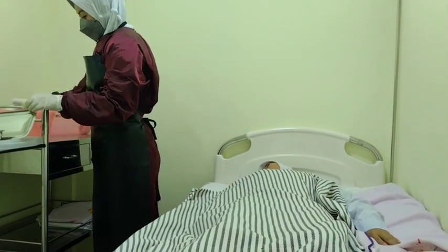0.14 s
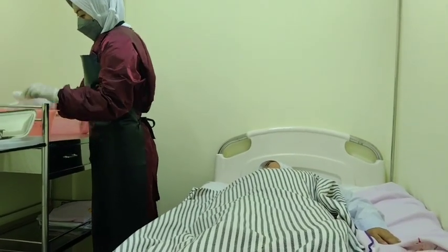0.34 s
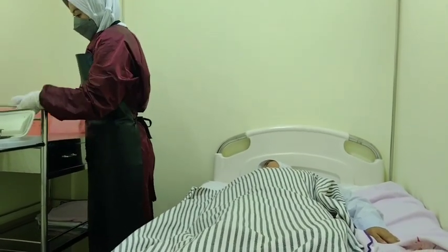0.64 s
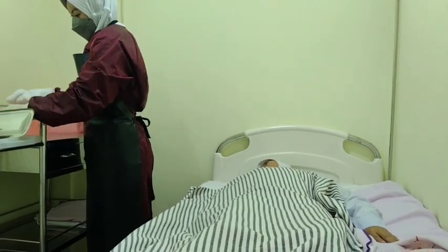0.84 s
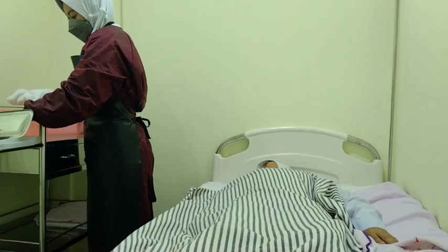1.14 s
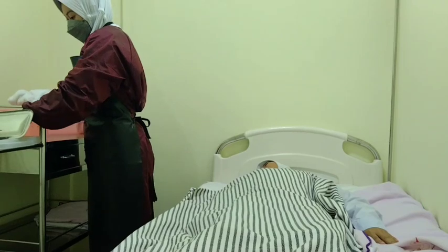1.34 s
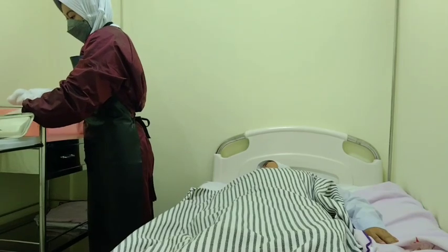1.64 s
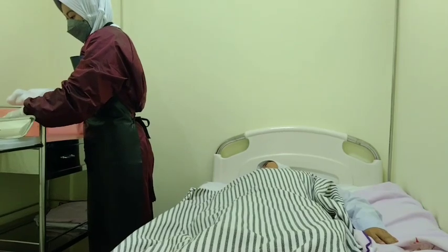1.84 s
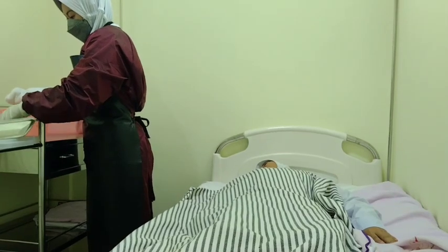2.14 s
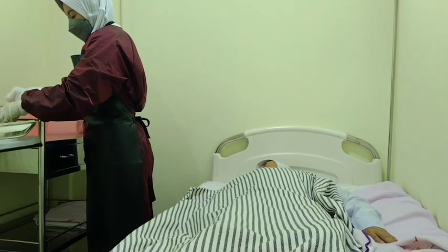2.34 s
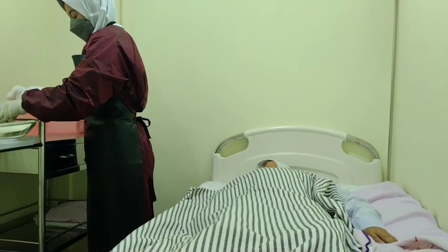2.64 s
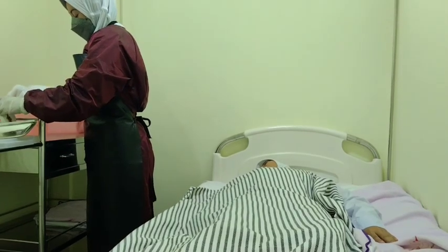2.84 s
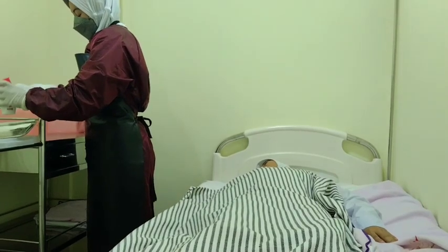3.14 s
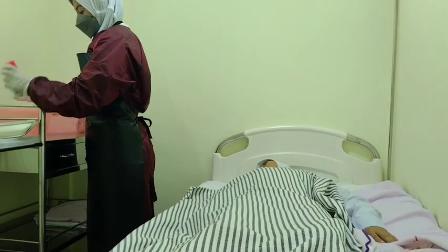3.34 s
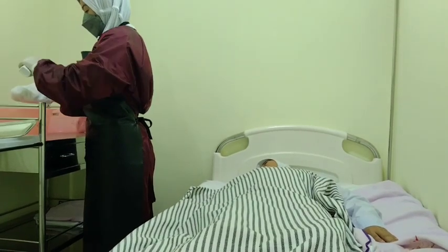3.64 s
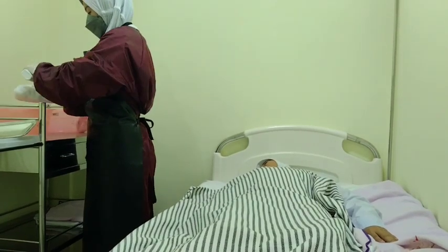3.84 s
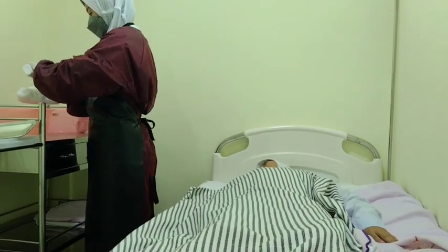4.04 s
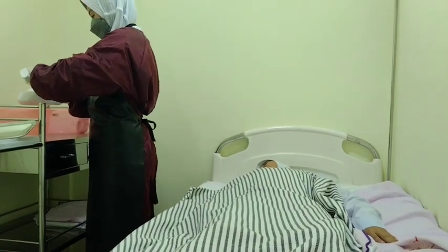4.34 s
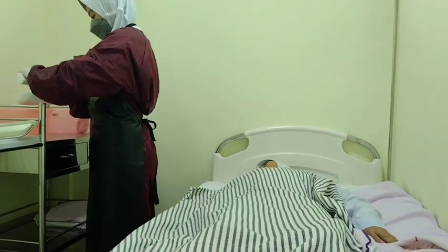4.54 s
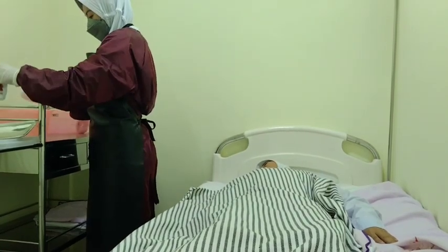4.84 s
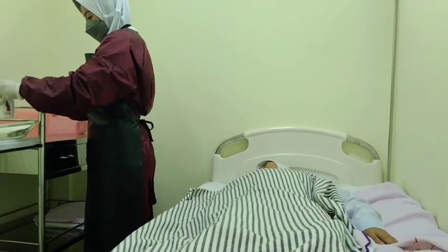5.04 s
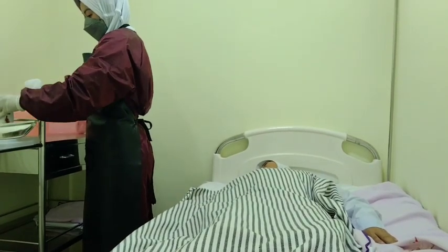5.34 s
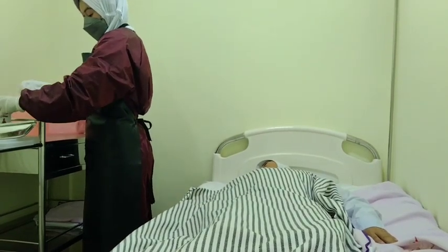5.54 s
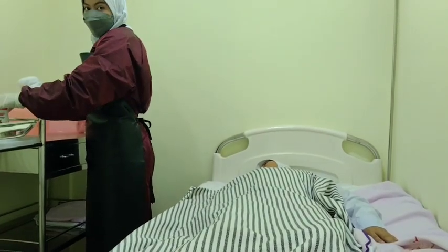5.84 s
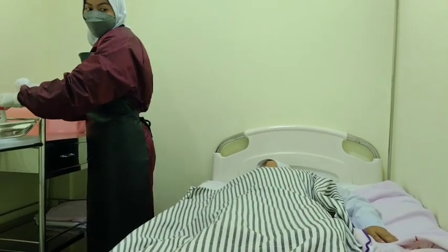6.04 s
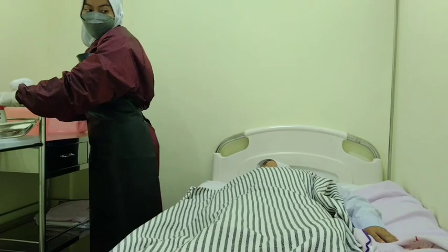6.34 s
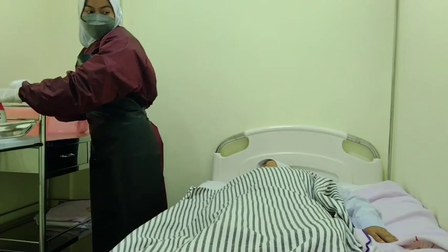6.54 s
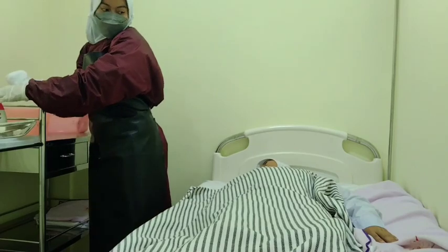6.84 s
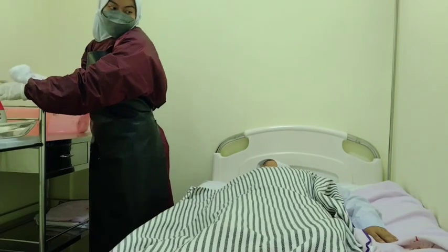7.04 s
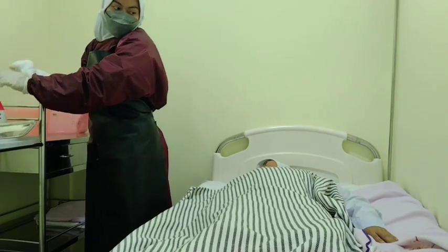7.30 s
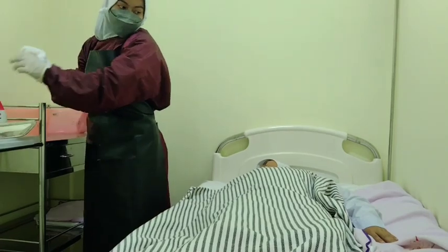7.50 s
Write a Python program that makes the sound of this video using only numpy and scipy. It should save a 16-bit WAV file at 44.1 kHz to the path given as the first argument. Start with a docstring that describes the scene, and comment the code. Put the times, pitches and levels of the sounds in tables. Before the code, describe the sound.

In a bare, echoing room with a low fan hum, a steel basin of water is lightly tapped and slid on a metal trolley. Cloth rustles, small rattles build to a loud ringing clang with plops and sloshing. After a quieter spell, a plastic bottle pops twice, then the basin knocks again with watery plops. Faint rustling ends it. The microphone is some way off, with steady noise held down.

```python
"""A fan hums in a bare, echoing room; then a steel basin of water is tapped, slid, jiggled and knocked on a metal trolley.
Shaped bursts of grit make the blows, and fading sine tones make the ringing steel, plops, bubbles and booms.
A washcloth rustles in gloved hands as a crackle of tiny grains; wet gloves tick at small pitches.
A plastic bottle snaps in narrow bands of noise and springs back with a rising rasp; faint high chirps waver.
A noise suppressor holds the steady noise down."""
import sys
import numpy as np
from scipy import signal
from scipy.fft import rfft, irfft
from scipy.io import wavfile
from scipy.ndimage import uniform_filter1d

SR = 44100
rng = np.random.default_rng(int(sys.argv[2]) if len(sys.argv) > 2 else 0)


def output_pcm(signal):
    """Save a mono or channel-first signal as 16-bit PCM at the path in sys.argv[1].

    Samples are clipped to [-1, 1] before scaling.
    """
    pcm = np.clip(np.atleast_2d(signal).T, -1, 1) * 32767
    wavfile.write(sys.argv[1], SR, np.round(pcm).astype(np.int16))


N = 338179
TIME = np.arange(N) / SR
BLOW_SIZE = 8192  # samples in one short sound
BLOW_S = 0.028  # a blow's level is its energy spread over this time
CUTOFF_HZ = 15800  # nothing much is left above this


def from_db(db):
    """Turns decibels into a plain factor for the wave's size."""
    return 10 ** (np.asarray(db) / 20)


def rms_one(x):
    """Scales a sound to an average (RMS) size of 1."""
    return x / np.sqrt(np.mean(x ** 2) + 1e-20)


def energy_one(x):
    """Scales a sound to a total energy of 1."""
    return x / np.sqrt(np.sum(x ** 2) + 1e-20)


def at_hz(points, hz):
    """Reads a table on a log-frequency axis."""
    known_hz, values = np.transpose(points)
    return np.interp(np.log(np.maximum(hz, 1)), np.log(known_hz), values)


def below(x, edge, order):
    """Near 1 under the edge, one half on it, near 0 over it; a higher order is steeper."""
    return 1 / (1 + (x / edge) ** order)


def peak(hz, centre_hz, width_hz, level_db):
    """Power of one resonance with steep skirts."""
    detuning = (hz ** 2 - centre_hz ** 2) / (hz * width_hz + 1)
    return from_db(level_db) ** 2 / (1 + detuning ** 2) ** 2


def response(gain):
    """The impulse response with this gain at each frequency, made to start at once (minimum phase)."""
    cepstrum = irfft(np.log(gain + 1e-6))
    cepstrum[1:len(gain) - 1] *= 2
    cepstrum[len(gain):] = 0
    return irfft(np.exp(rfft(cepstrum)))


def coloured(x, gain):
    """Filters a sound so that each frequency gets its own gain."""
    return signal.oaconvolve(x, response(gain))[:len(x)]


def blow_axes():
    """Seconds and frequencies of one short blow."""
    return np.arange(BLOW_SIZE) / SR, np.fft.rfftfreq(BLOW_SIZE, 1 / SR)


def add(out, s, level_db, sound):
    """Places a blow; its level is that of its energy spread over BLOW_S."""
    at = round(s * SR)
    blow = from_db(level_db) * np.sqrt(BLOW_S * SR) * energy_one(sound)
    out[at:at + len(sound)] += blow[:N - at]


def strokes(middle_s, level_db, half_s):
    """Gain of a movement that swells and fades."""
    return from_db(level_db) * np.exp(-((TIME - middle_s) / half_s) ** 2 / 2)


def grit(count, spread_db):
    """Dense tiny contacts whose size changes every 32 samples."""
    sizes_db = spread_db * np.repeat(rng.standard_normal(count // 32 + 1), 32)[:count]
    return rms_one(rng.standard_normal(count) * from_db(sizes_db))


def contact(t, chatter_s, click_db, grip_s):
    """A first click, then a chatter that builds as the surfaces meet and dies away."""
    fade = np.exp(-t / max(chatter_s, .001))  # never shorter than 1 ms
    force = energy_one(grit(BLOW_SIZE, spread_db=5) * (1 - np.exp(-t / grip_s)) * fade)
    force[0] += from_db(click_db)
    return force


def touch_gain(hz, hollow_db, edge_db):
    """A heavy touch adds body; a hard one holds back everything under the bright edge."""
    hollow = hollow_db * below(hz, edge=630, order=4)
    return from_db(hollow - edge_db * below(hz, edge=4700, order=4))


def thicket(hz, start_hz, width_hz, between_db, count):
    """Many narrow modes of uneven strength crowd the treble; returns a gain of mean power 1."""
    draws = rng.random((count, 2))
    centres = start_hz + (CUTOFF_HZ - start_hz) * (np.arange(count) + draws[:, 0]) / count
    power = sum((0.15 + size) ** 2 / (1 + (2 * (hz - centre) / width_hz) ** 2)
                for centre, size in zip(centres, draws[:, 1]))
    power = power / power[(hz > start_hz) & (hz < CUTOFF_HZ)].mean()
    between = from_db(between_db) ** 2  # fills the gaps between modes
    return np.sqrt(np.where(hz > start_hz, (power + between) / (1 + between), 1))


def sheet(hz):
    """Every touch lands elsewhere on the thin steel and favours other treble modes."""
    return thicket(hz, start_hz=2400, width_hz=22, between_db=-5, count=120)


# fan hum lines: (f/Hz, level/dB as RMS)
HUM_LINES = [(91.5, -49), (95.8, -56.5), (150.7, -59), (184, -55)]
# colour of the moving room air: (f/Hz, level/dB)
AIR_COLOUR = [(25, -28.5), (64, -25), (78, -23.5), (96, -5.5), (119, -12), (188, -8), (313, -15.5),
              (567, -16.5), (722, -22), (1490, -23), (3400, -36.5), (4100, -32), (4800, -42.5),
              (15500, -45.5)]
AIR_DB = -49


def fan(waver_hz=.6):
    """Beating, slowly wandering hum lines over the noise of moving air."""
    _, hz = blow_axes()
    out = from_db(AIR_DB) * rms_one(coloured(rng.standard_normal(N), from_db(at_hz(AIR_COLOUR, hz))))
    for line_hz, line_db in HUM_LINES:
        wander = np.interp(TIME, np.linspace(0, TIME[-1], 60), rng.standard_normal(60))
        phase = 2 * np.pi * np.cumsum(line_hz + waver_hz * wander) / SR
        out += from_db(line_db) * np.sqrt(2) * np.sin(phase)
    return out


# wall modes of the water-damped basin, each with one more wave round the rim: (f/Hz, width/Hz, level/dB)
WALL_MODES = [(295, 60, -1.5), (761, 62, 9.5), (1190, 120, -0.5), (1580, 240, 1)]
# the rim's main resonance, a single row: (f/Hz, width/Hz, level/dB before the touch's own rim level)
RIM_RESONANCE = (2240, 290, 3.5)
# broad treble of thin steel: (f/Hz, width/Hz, level/dB)
STEEL_SHEEN = [(3400, 1000, -10.5), (7100, 5200, -11.5), (12600, 7600, -27)]


def basin_gain(hz, place, rim_db, between_db=-10.0):
    """A wall mode stays quiet when touched near one of its nodes; the tray fills in between the modes."""
    wall = sum(peak(hz, *mode) * (np.cos((k + 1) * place) ** 2 + .01)
               for k, mode in enumerate(WALL_MODES))
    rim = peak(hz, *RIM_RESONANCE) * from_db(rim_db) ** 2
    tray = peak(hz, centre_hz=1440, width_hz=1100, level_db=between_db)
    sheen = sum(peak(hz, *mode) for mode in STEEL_SHEEN)
    return np.sqrt(wall + rim + tray + sheen)


# light taps on the basin: (t/s, level/dB, bright edge/dB, place round the rim/rad, rim mode/dB)
BASIN_TAPS = [(0.195, -26.5, -2.5, 1.58, 2), (.948, -26, -3, 0, -4.5), (1.005, -33.5, -16.5, 0, -12.5),
              (1.246, -51, -14.5, 0, 15.5), (5.533, -30.5, -0.5, 0.42, 10.5), (5.872, -38, -17, 0.18, 28)]
TAP_CHATTER_S, TAP_HOLLOW_DB = 0.0042, -6.5


def taps():
    """Light touches wake mostly the basin's own modes."""
    out, (t, hz) = np.zeros(N), blow_axes()
    for s, level_db, edge_db, place, rim_db in BASIN_TAPS:
        gain = basin_gain(hz, place, rim_db) * sheet(hz) * touch_gain(hz, TAP_HOLLOW_DB, edge_db)
        add(out, s, level_db, coloured(contact(t, TAP_CHATTER_S, click_db=-10.0, grip_s=0.0019), gain))
    return out


# the rim's cluster of close modes, set off by taps and knocks: (f/Hz, level/dB, T60/s)
RIM_MODES = [(2239, -1, 0.79), (2230, 1, 0.8), (2269, -4, 0.9)]
# long ringing modes of the steel, set off by knocks: (f/Hz, level/dB, T60/s)
STEEL_MODES = [(299, -1, .6), (495, -10, 0.54), (547, -7, 1), (1065, -8.5, 0.88), (1044, -5.5, .8),
               (1258, -7.5, 0.72), (1340, -9, 1), (1483, -10.5, 0.88), (1635, -7, 0.97), (2000, -12.5, .8),
               (2490, -1.5, .8), (2653, -6.5, 1), (3700, -16, .6), (3692, -21.5, 0.53), (3950, -17.5, 1),
               (4830, -24, 1), (5160, -22, .5), (6600, -23, 0.36), (6829, -18, 0.64), (7380, -21.5, .5)]


def ringing(rows, modes, ring_db):
    """Contacts feed each steel mode; energies add up and die away, and swaying water bends the pitch."""
    out, at = np.zeros(N), [round(row[0] * SR) for row in rows]
    levels_db = np.array(rows)[:, 1]
    for hz, mode_db, t60 in modes:
        fed = np.zeros(N)
        fed[at] = from_db(levels_db + mode_db + ring_db + rng.standard_normal(len(at))) ** 2
        kept = from_db(-60 / (t60 * SR)) ** 2  # share of the energy left after one sample
        energy = signal.lfilter([1], [1, -kept], fed + 1e-18)
        sway_hz = 6 * np.interp(TIME, np.linspace(0, TIME[-1], 130), rng.standard_normal(130))
        out += np.sqrt(energy) * np.sin(2 * np.pi * np.cumsum(hz + sway_hz) / SR)
    return out


# the larger plops of the water: (t/s, level/dB, f/Hz at the start)
WATER_PLOPS = [(.212, -39, 489), (.265, -46.5, 552), (0.972, -39, 285), (1.445, -37.5, 320),
               (2.155, -49.5, 470), (2.188, -36.5, 305), (2.262, -21, 303.3), (2.370, -25, 320),
               (2.590, -30.5, 321), (2.625, -41.5, 200), (2.712, -34, 500), (2.738, -42.5, 682),
               (3.823, -49.5, 504), (5.443, -22.5, 529), (5.495, -27, 310), (5.628, -33, 515),
               (5.626, -20, 290), (5.655, -26.5, 503), (5.675, -28.5, 190), (5.795, -44, 530),
               (5.810, -39.5, 175), (5.892, -34, 295)]
PLOP_CYCLES = 25  # cycles of the starting pitch until a plop has died away
DROP_S, DROP_DB, DROP_PITCH = 0.04, -11.5, 1.5  # the smaller drop: delay, level change, pitch ratio


def water(rise=0.21):
    """A pocket of air rings briefly and rises in pitch; a smaller drop follows it."""
    out, (t, _) = np.zeros(N), blow_axes()
    drops = [(s + DROP_S, level_db + DROP_DB, pitch_hz * DROP_PITCH)
             for s, level_db, pitch_hz in WATER_PLOPS]
    for s, level_db, pitch_hz in list(WATER_PLOPS) + drops:
        t60 = PLOP_CYCLES / pitch_hz
        tone = np.sin(2 * np.pi * pitch_hz * t * (1 + rise * t / t60 / 2))
        add(out, s, level_db, tone * from_db(-60 * t / t60) * (1 - np.exp(-t / 0.0035)))
    return out


CRACKLES_PER_S, CRACKLE_T60_S, CRACKLE_SPREAD_DB = 1300, .022, 4.5


def crackle(count=8000):
    """Random grains, each with its own size and pitch."""
    out, t = np.zeros(N + SR), TIME[:SR // 40]
    draws = rng.random((count, 3))
    times = np.cumsum(-np.log(1 - draws[:, 0])) / CRACKLES_PER_S  # random gaps
    for s, (_, size, pitch) in zip(times, draws):
        if s < TIME[-1]:
            at, hz = round(s * SR), 1000 + pitch * (CUTOFF_HZ - 1000)
            grain_db = -CRACKLE_SPREAD_DB * np.log(.03 + size) - 60 * t / CRACKLE_T60_S
            out[at:at + len(t)] += np.sin(2 * np.pi * hz * t) * from_db(grain_db)
    return rms_one(out[:N])


# strokes of cloth and gloves: (middle t/s, level/dB, half length/s)
CLOTH_STROKES = [(0.439, -57.5, 0.053), (0.66, -51.5, 0.055), (1.24, -57.5, 0.036), (1.648, -45.5, 0.014),
                 (1.77, -51, 0.041), (2.10, -50.5, 0.048), (2.41, -36, 0.01), (2.522, -41, 0.026),
                 (3.636, -62.5, 0.05), (6.69, -50, 0.13), (6.919, -48.5, 0.033), (7.303, -62.5, 0.062),
                 (7.643, -50.5, 0.053)]
# colour of rubbed cloth: (f/Hz, level/dB)
CLOTH_COLOUR = [(300, -29.5), (1200, -13.5), (2300, -2.5), (3200, -7), (4100, 2), (5300, -2.5), (7600, 6.5),
                (10500, -9.5), (15500, -17.5)]
HAZE_DB = -1.5  # the hiss between the grains, against the crackle


def cloth():
    """Fibres and gloves catch and slip in an irregular bright crackle over a soft hiss."""
    _, hz = blow_axes()
    friction = crackle() + from_db(HAZE_DB) * grit(N, spread_db=9.5)
    rustle = rms_one(coloured(friction, from_db(at_hz(CLOTH_COLOUR, hz))))
    return sum(strokes(*rub) for rub in CLOTH_STROKES) * rustle


# small pitched ticks: wet gloves, a light tap's rim ring at 1.245 s, the bottle's snap at 4.62 s: (t/s,
# level/dB, f/Hz)
PITCHED_TICKS = [(0.456, -57, 3410), (0.488, -48.5, 1630), (.597, -65, 3880), (.642, -55.5, 1270),
                 (.652, -52, 2230), (.678, -48.5, 2044), (.680, -63, 3340), (0.696, -52.5, 2860),
                 (1.245, -51, 2245), (3.210, -51, 1315), (3.216, -54, 2216), (4.616, -55, 2884),
                 (4.630, -62.5, 6990), (4.662, -60, 4120), (6.349, -68, 4440), (6.631, -63, 4830),
                 (6.703, -58, 1840), (6.706, -64, 2320), (6.723, -63, 3330), (6.885, -62, 2295),
                 (6.941, -60.5, 3764)]
TICK_T60_S, TICK_RISE_S = 0.032, .003


def ticks():
    """A tick is a brief soft squeak at a pitch of its own."""
    out, (t, _) = np.zeros(N), blow_axes()
    for s, level_db, pitch_hz in PITCHED_TICKS:
        shape = from_db(-60 * t / TICK_T60_S) * (1 - np.exp(-t / TICK_RISE_S))
        add(out, s, level_db, np.sin(2 * np.pi * pitch_hz * t) * shape)
    return out


# steel sliding on the tray:
# (middle t/s, level/dB, half length/s, hollow body/dB, bright edge/dB, place round the rim/rad)
TRAY_SLIDES = [(0.708, -45.5, 0.042, -41, -1.5, 1.55), (1.71, -41, .018, -13.5, -8.5, 0.81),
               (1.796, -43, 0.042, -9, -10.5, 0.06), (2.09, -52.5, .03, -9, -9.5, .75),
               (2.2, -29, 0.022, -2, -3.5, 0.5)]


def sliding(slips_per_s=100):
    """Dragged steel sticks and slips in uneven little clicks that ring the basin."""
    out, (_, hz) = np.zeros(N), blow_axes()
    for s, level_db, half_s, hollow_db, edge_db, place in TRAY_SLIDES:
        slips = (rng.random(N) < slips_per_s / SR) * rng.choice([-1, 1], N) * rng.uniform(0.57, 1, N)
        scrape = slips + 0.019 * rng.standard_normal(N)
        gain = basin_gain(hz, place, rim_db=3.0, between_db=-11.5) * sheet(hz)
        gain = gain * touch_gain(hz, hollow_db, edge_db)
        out += strokes(s, level_db, half_s) * rms_one(coloured(scrape, gain))
    return out


# the basin jiggles on the tray in small scuffing knocks: (t/s, level/dB, favoured f/Hz)
SMALL_KNOCKS = [(1.398, -40.5, 715), (1.648, -47, 1180), (1.707, -37.5, 1230), (1.712, -41, 2220),
                (1.737, -41.5, 725), (1.752, -37.5, 1560), (1.776, -41.5, 2080), (1.791, -32.5, 1260),
                (1.797, -42.5, 715), (1.825, -38, 1440), (1.845, -44.5, 2010), (1.875, -47, 1520),
                (1.970, -52, 1210), (2.044, -47.5, 715), (2.064, -45, 1030), (2.070, -45, 2200),
                (2.103, -43, 900), (2.114, -45.5, 2010), (2.135, -48.5, 3460), (2.153, -39.5, 2203),
                (2.162, -36, 880), (2.196, -27.5, 745), (2.520, -30, 1230), (2.718, -37.5, 1260),
                (2.754, -49, 1100), (2.822, -45.5, 1900), (2.885, -50, 1470), (2.903, -53, 750),
                (5.915, -43.5, 1350), (7.607, -53, 1520), (7.65, -46.5, 1300)]
# modes that a small knock wakes: (f/Hz, level/dB, T60/s), with pitch and level varied a little each time
SMALL_KNOCK_MODES = [(726, 2.5, .11), (837.4, -8.5, 0.024), (1030, -6.5, 0.26), (1090, -0.5, .06),
                     (1204, 3, .12), (1290, -6.5, .06), (1450, -2.5, .07), (1520, 0.5, .11),
                     (1880, -8, 0.084), (2010, -0.5, .14), (2200, -1, .07), (2250, 2.5, .16),
                     (2410, -11, 0.048), (2805, -6, .14), (3460, -6.5, .14)]
JIGGLE_REACH = 0.15  # half width of the favoured region, as a share of its pitch
JIGGLE_OTHERS_DB = -15  # level of the other modes


def jiggling(scatter_db=-1.0):
    """Each small knock scuffs briefly, lands elsewhere on the base and favours other modes."""
    out, (t, _) = np.zeros(N), blow_axes()
    for s, level_db, favoured_hz in SMALL_KNOCKS:
        sound = 0
        draws = rng.standard_normal((len(SMALL_KNOCK_MODES), 2))
        for (mode_hz, mode_db, t60), (loud, sharp) in zip(SMALL_KNOCK_MODES, draws):
            share = below(abs(mode_hz / favoured_hz - 1), JIGGLE_REACH, order=4) + from_db(JIGGLE_OTHERS_DB)
            fade = from_db(mode_db + scatter_db * loud - 60 * t / t60)
            tone = np.sin(2 * np.pi * mode_hz * (1 + .006 * sharp) * t)
            sound = sound + share * np.sign(sharp) * fade * tone
        scuff = contact(t, chatter_s=.012, click_db=-4, grip_s=.003)
        add(out, s, level_db, signal.oaconvolve(sound, scuff)[:BLOW_SIZE])
    return out


# the basin is knocked or set down on the tray: (t/s, first touch level/dB, landing level/dB,
# first rock level/dB, thump/dB, hollow body/dB, bright edge/dB, chatter of the landing/s)
BASIN_KNOCKS = [(1.411, -25.5, -22.5, -35.5, -17, 1, -6.5, 0.02),
                (2.190, -24, -21, -33.5, -27.5, -2, 0, 0.032),
                (2.230, -10.5, -11, -23, -11.5, 8.5, -5.5, 0.029),
                (2.278, -12.5, -14, -17, 6, -4, -4.5, 0.016),
                (5.432, -25, -19, -25.5, -4.5, 9.5, -4.5, 0.01),
                (5.607, -17.5, -24, -47.5, -6, 4.5, 2.5, 0.11),
                (5.885, -38.5, -39.5, -50.5, -6.5, -9, 9.5, 0.014)]
LANDING_S = .015  # the full weight lands this long after the first touch
# the first touch is short and thin beside the landing
TOUCH_CHATTER_S, TOUCH_HOLLOW_DB, TOUCH_EDGE_DB = 0.0046, -10.5, 3.5
# then the basin rocks, weaker and duller each time
ROCK_S, ROCK_LOSS_DB, ROCK_CHATTER_S, ROCK_DULLING_DB = .103, 6.5, 0.036, 4
ROCK_THUMP_DB = -1.5  # a rock thumps a little less


def knock_blows():
    """The basin touches with one edge, lands, then rocks; rows of s, level, thump, hollow, edge, chatter."""
    blows = []
    for s, touch_db, landing_db, rock_db, thump_db, hollow_db, edge_db, chatter_s in BASIN_KNOCKS:
        blows.append((s, touch_db, thump_db, hollow_db + TOUCH_HOLLOW_DB,
                      edge_db + TOUCH_EDGE_DB, TOUCH_CHATTER_S))
        blows.append((s + LANDING_S, landing_db, thump_db, hollow_db, edge_db, chatter_s))
        for k in range(4):
            blows.append((s + (k + 1) * ROCK_S, rock_db - k * ROCK_LOSS_DB, thump_db + ROCK_THUMP_DB,
                          hollow_db, edge_db - k * ROCK_DULLING_DB, ROCK_CHATTER_S))
    return blows


# colour of a knock on the loaded tray: (f/Hz, level/dB)
TRAY_COLOUR = [(66, -35), (94, -7), (122, -10.5), (160, -12.5), (300, -2.5), (400, -9), (500, -4),
               (680, -3.5), (870, -7.5), (1200, 3), (2300, -6), (3000, -13.5), (4400, -23.5), (7200, -19),
               (10000, -31), (15500, -36.5)]


def knocks():
    """Heavy blows shake the basin and the whole tray."""
    out, (t, hz) = np.zeros(N), blow_axes()
    for s, level_db, thump_db, hollow_db, edge_db, chatter_s in knock_blows():
        body = from_db(at_hz(TRAY_COLOUR, hz) + thump_db * below(hz, edge=220, order=6))
        force = contact(t, chatter_s, click_db=-2.5, grip_s=0.00052)
        add(out, s, level_db, coloured(force, body * sheet(hz) * touch_gain(hz, hollow_db, edge_db)))
    return out


# the water sloshes after a jolt:
# (t/s, first bubbles' level/dB, fall/(dB per s), length/s, lowest f/Hz, highest starting f/Hz)
WATER_SLOSHES = [(2.239, -25.5, 54, .5, 285.6, 2000), (5.619, -33, 93.5, 0.25, 303, 2000)]
BUBBLE_T60_S, BUBBLE_SPREAD_DB = .05, 3.5
BUBBLE_RISE = 0.064  # share of the pitch gained while a bubble rings


def sloshing(count=26):
    """Small bubbles ring at random moments and pitches, weaker as the water settles."""
    out, (t, _) = np.zeros(N), blow_axes()
    for s, level_db, fall_db, length_s, low_hz, high_hz in WATER_SLOSHES:
        for when, size, loud in rng.random((count, 3)):
            delay, pitch_hz = when * length_s, low_hz * (high_hz / low_hz) ** size
            tone = np.sin(2 * np.pi * pitch_hz * t * (1 + BUBBLE_RISE * t / BUBBLE_T60_S / 2))
            bubble = tone * from_db(-60 * t / BUBBLE_T60_S) * (1 - np.exp(-t / 0.0018))
            bubble_db = level_db - fall_db * delay + BUBBLE_SPREAD_DB * (2 * loud - 1)
            add(out, s + delay, bubble_db, bubble)
    return out


# the trolley's shelf booms under the heaviest blows: (t/s, level/dB, f/Hz, T60/s)
SHELF_BOOMS = [(2.248, -28, 117, 0.17), (2.294, -24, 123.5, 0.21), (2.300, -28.5, 99.2, 0.56),
               (4.288, -40, 93.6, 0.31), (5.448, -33.5, 118, 0.1), (5.616, -30, 199, 0.19)]


def booms(swell_s=0.0082):
    """The thin shelf swings slowly in its lowest modes."""
    out, t = np.zeros(N), TIME[:SR // 2]
    for s, level_db, hz, t60 in SHELF_BOOMS:
        shape = (1 - np.exp(-t / swell_s)) * from_db(-60 * t / t60)
        add(out, s, level_db, np.sin(2 * np.pi * hz * t) * shape)
    return out


# clicks of the plastic bottle:
# (t/s, level/dB, lowest f/Hz, highest f/Hz, cavity f/Hz, hiss/dB, scrape/s)
BOTTLE_SNAPS = [(3.194, -53, 1540, 5200, 4000, -28, 0.016), (3.206, -57, 1800, 5474, 4600, -47, .014),
                (4.259, -45.5, 5100, 7550, 6100, -11, .003), (4.269, -29.5, 668, 2275, 2130, -11, .0008),
                (4.276, -41.5, 1210, 5240, 2300, -22, 0.0018), (4.282, -38.5, 868, 3400, 1486, -24, 0.0024),
                (4.294, -38, 890, 3477, 2000, -12.5, 0.0071), (4.619, -58, 2630, 5000, 2900, 1, .025),
                (4.662, -57.5, 3900, 4900, 4200, 0.5, 0.02), (5.055, -39, 1210, 3260, 1380, -34, 0.0033),
                (5.058, -25.5, 1040, 3559, 1340, -31.5, 0.0023), (5.068, -47, 1400, 3250, 2140, -27, 0.016),
                (5.083, -31.5, 1093, 2920, 1310, -27, 0.0065)]
CAVITY_DB = 10.5


def bottle():
    """A plastic snap is a click and a brief scrape in one band, with a cavity peak and a thin hiss on top."""
    out, (t, hz) = np.zeros(N), blow_axes()
    shell = np.sqrt(peak(hz, centre_hz=6800, width_hz=2500, level_db=0)
                    + peak(hz, centre_hz=3100, width_hz=1800, level_db=0))
    for s, level_db, low_hz, high_hz, cavity_hz, hiss_db, scrape_s in BOTTLE_SNAPS:
        band = (1 - below(hz, low_hz, order=12)) * below(hz, high_hz, order=9)
        cavity = from_db(CAVITY_DB * below(np.abs(hz / cavity_hz - 1), edge=.12, order=2))
        force = contact(t, scrape_s, click_db=-5, grip_s=0.0036)
        add(out, s, level_db, coloured(force, band * cavity + from_db(hiss_db) * shell))
    return out


# faint chirps in two registers: (t/s, level/dB, f/Hz)
FAINT_CHIRPS = [(3.339, -53.5, 1610), (3.373, -55.5, 1620), (3.583, -65, 4050), (3.635, -55.5, 1600),
                (3.655, -68, 4050), (3.691, -56, 1600), (3.904, -57.5, 1380), (4.006, -69.5, 4180),
                (4.764, -63, 4080), (4.812, -64, 4080), (5.343, -62, 3920), (5.385, -56, 1630),
                (6.186, -54.5, 1600), (6.325, -59, 1590), (6.435, -65.5, 4110), (6.534, -60, 1510),
                (6.532, -62, 4090), (6.745, -55, 1600), (7.207, -64, 3960), (7.373, -58, 1510)]


def chirps(length_s=0.008, waver=0.0084):
    """Short, soft, slightly unsteady tones."""
    out, (t, _) = np.zeros(N), blow_axes()
    for s, level_db, pitch_hz in FAINT_CHIRPS:
        drift = rms_one(uniform_filter1d(rng.standard_normal(BLOW_SIZE), size=200))
        pitch = pitch_hz * (1 + waver * drift)
        add(out, s, level_db, np.sin(2 * np.pi * np.cumsum(pitch) / SR) * t * np.exp(-t / length_s))
    return out


# the squeezed bottle springs back with a rising hollow rasp:
# (t/s, level/dB, first f/Hz, last f/Hz, width/Hz, length/s)
BOTTLE_RASPS = [(4.284, -34.5, 1350, 2207, 635, 0.15), (5.10, -35.5, 1180, 1450, 480, .13)]


def spring_back(fade_db=-10):
    """The dent creeps out of the bottle and its resonance climbs as it fades."""
    out, (t, hz) = np.zeros(N), blow_axes()
    for s, level_db, first_hz, last_hz, width_hz, length_s in BOTTLE_RASPS:
        pitch = np.interp(t, [0, length_s], [first_hz, last_hz])
        rasp = coloured(grit(BLOW_SIZE, spread_db=3.5), below(hz, width_hz / 2, order=3))
        shape = from_db(fade_db * t / length_s) * below(t, length_s, order=12)
        add(out, s, level_db, rasp * np.sin(2 * np.pi * np.cumsum(pitch) / SR) * shape)
    return out


# how long the room's echo lasts in each band: (f/Hz, T60/s)
ECHO_TIMES = [(100, 1), (300, 0.45), (1000, 0.28), (2500, 0.55), (7000, 0.59), (15000, 0.27)]


def room(x, direct_db, early_db=7.5, early_s=0.0056):
    """The direct sound, strong early reflections off hard walls, and a tail that dies by band."""
    t, hz = TIME[:SR], np.fft.rfftfreq(SR, 1 / SR)
    white, tail = rfft(grit(SR, spread_db=0.5)), 0
    for k, (_, t60) in enumerate(ECHO_TIMES):
        share = at_hz([(row[0], j == k) for j, row in enumerate(ECHO_TIMES)], hz)
        tail = tail + irfft(white * share, SR) * from_db(-60 * t / t60)
    early = from_db(early_db * np.exp(-t / early_s))
    echo = energy_one(tail * early * (1 - np.exp(-t / 0.0015)))
    echo[0] += from_db(direct_db)
    return signal.oaconvolve(x, energy_one(echo))[:N]


SUPPRESS_DB = -10  # the deepest cut
SUPPRESS_OVER_DB = 10  # this far over the floor, the cut is half released


def suppressor(x):
    """Turns down what stays near its frequency's floor: tails end early, faint rustles turn grainy."""
    _, _, z = signal.stft(x, nperseg=1024, noverlap=768)
    power = uniform_filter1d(np.abs(z) ** 2, size=3, axis=-1)
    floor = np.percentile(power, 15, axis=-1, keepdims=True) + 1e-20
    shut = below(power / floor, from_db(SUPPRESS_OVER_DB) ** 2, order=3)
    quieter = z * (1 - shut * (1 - from_db(SUPPRESS_DB)))
    return signal.istft(quieter, nperseg=1024, noverlap=768)[1][..., :N]


def scene():
    """Three groups get room echo with their own share of direct sound; ringing, booms and fan are added as is."""
    steel = ringing(knock_blows(), STEEL_MODES, ring_db=-17.5)
    steel = steel + ringing(knock_blows(), RIM_MODES, ring_db=-12.0)
    steel = steel + ringing(BASIN_TAPS, RIM_MODES, ring_db=-15.0)
    # mostly heard by way of the walls
    trolley = room(knocks() + taps() + sliding() + cloth() + ticks(), direct_db=-8.0)
    held = room(bottle(), direct_db=2) + room(spring_back(), direct_db=2.5)
    small = room(water() + sloshing() + chirps() + jiggling(), direct_db=-1.5)
    return (trolley + held + small + steel + booms() + fan())[None]


def record(dry):
    """Steady noise is suppressed, peaks are clipped at full scale and the top is cut."""
    clipped = np.clip(suppressor(dry), -1, 1)
    top_cut = signal.ellip(10, .2, 70, CUTOFF_HZ, fs=SR, output="sos")
    return signal.sosfilt(top_cut, clipped)


dry = scene()
out = record(dry)
output_pcm(out)
```